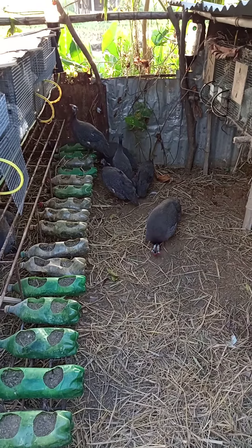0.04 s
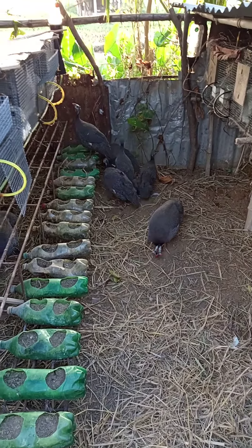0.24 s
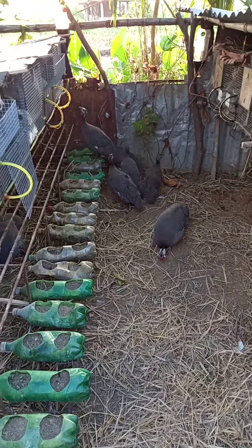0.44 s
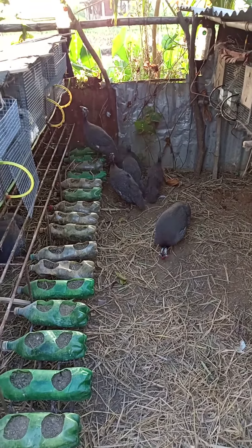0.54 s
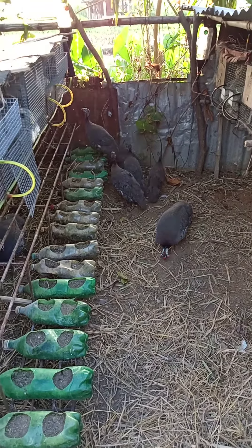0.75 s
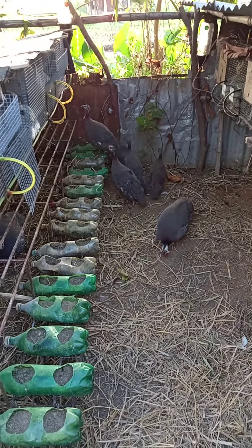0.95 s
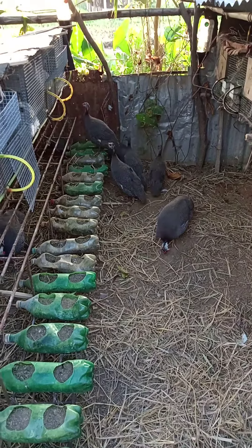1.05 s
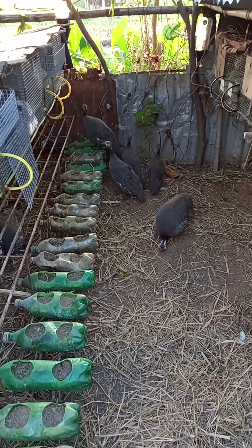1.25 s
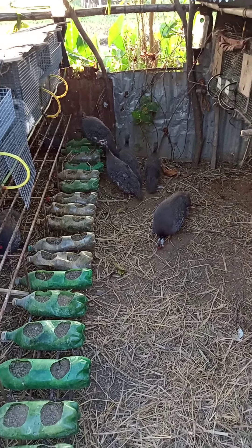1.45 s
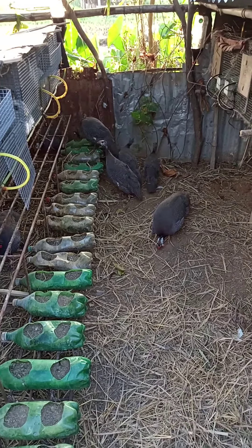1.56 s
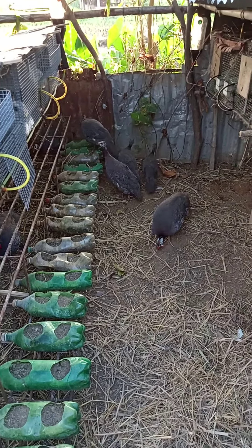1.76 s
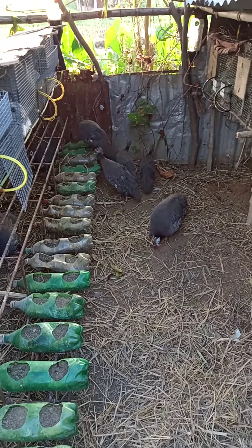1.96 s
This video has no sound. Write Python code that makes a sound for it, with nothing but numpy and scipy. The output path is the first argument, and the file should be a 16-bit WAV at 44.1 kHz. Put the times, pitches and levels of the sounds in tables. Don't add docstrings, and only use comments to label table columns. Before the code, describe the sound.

Guinea fowl nearby gives two short harsh chucks in a straw-floored pen, flock clucking softly

```python
import sys
import numpy as np
from scipy import signal
from scipy.fft import rfft, irfft
from scipy.io import wavfile
from scipy.ndimage import uniform_filter1d

SR = 44100
rng = np.random.default_rng(int(sys.argv[2]) if len(sys.argv) > 2 else 0)


def bounce(signal):
    frames = np.transpose(np.atleast_2d(signal))
    limited = np.clip(frames, -1, 1)
    pcm = np.round(limited * 32767).astype(np.int16)
    wavfile.write(sys.argv[1], SR, pcm)


def attenuation_scalar(level_db):
    decades = np.asarray(level_db, float) / 20
    return 10 ** decades


N = 88200
T = np.arange(N) / SR
HZ = np.maximum(np.arange(N // 2 + 1) * SR / N, 1)


def rms_one(x):
    return x / np.sqrt(np.mean(x ** 2) + 1e-20)


def at_hz(points):
    hz, db = np.transpose(points)
    return attenuation_scalar(np.interp(np.log(HZ), np.log(hz), db))


def drift(rate_hz):
    r = np.exp(-2 * np.pi * rate_hz / SR)
    noise = rng.standard_normal(N + SR)
    wander = signal.lfilter([1], [1, -2 * r, r * r], noise)
    return rms_one(wander[SR:])


def resonate(x, hz, width_hz):
    r = np.exp(-np.pi * width_hz / SR)
    for _ in range(2):
        x = signal.lfilter([1, 0, -1], [1, -2 * r * np.cos(2 * np.pi * hz / SR), r * r], x)
    return rms_one(x)


def swell(peak, rise, fall):
    up = np.sin(np.pi / 2 * np.clip(1 + (T - peak) / rise, 0, 1)) ** 2
    down = attenuation_scalar(-20 * np.maximum(T - peak, 0) / max(fall, .002))
    return up * down


def syrinx(rate_hz, jitter, breath):
    phase = np.cumsum(rate_hz * (1 + jitter * drift(120))) / SR
    slap_sizes = attenuation_scalar(3.4 * rng.standard_normal(N))
    slaps = np.diff(np.floor(phase), prepend=0) * slap_sizes
    puffs = rng.standard_normal(N) * np.exp(-3 * (phase % 1))
    breath = np.clip(breath, 0, 1)
    return (1 - breath) * rms_one(slaps) + breath * rms_one(puffs)


def near_chucks():
    # (start [s], pulse rate [Hz], pulse jitter [0-1], breath share [0-1], beak closes after [s])
    calls = [
        (.203, 362, .2, .55, .062),
        (1.212, 334, .15, .6, .056),
    ]
    # (pitch [Hz], width [Hz], level [dB], peak after start [s], fall per 20 dB [s])
    first_throat = [(1020, 260, -35, .022, .025), (1300, 300, -30, .026, .02), (1650, 250, -35, .011, .07),
                    (2240, 300, -30, .034, .04), (2480, 250, -28, .026, .025), (2720, 200, -29, .018, .035),
                    (3050, 300, -28, .026, .06), (3640, 260, -29, .043, .05), (3950, 400, -28, .024, .05),
                    (4600, 800, -36, .022, .07), (1900, 400, -35, .02, .05), (8200, 2000, -45, .028, .04),
                    (12500, 3500, -45, .03, .06), (3350, 250, -27, .025, .05)]
    second_throat = [(1606, 103, -34, .028, .012), (2312, 120, -31, .02, .025), (2500, 200, -30, .024, .03),
                     (2850, 170, -33, .031, .006), (3520, 300, -28, .027, .016),
                     (4050, 300, -29, .028, .008), (3700, 620, -36, .042, .015),
                     (4550, 400, -37, .022, .03), (3520, 250, -33, .053, .009),
                     (2500, 330, -41, .0057, .01), (8470, 3700, -48, .033, .03),
                     (12500, 3500, -52, .028, .04), (4950, 400, -43, .031, .012),
                     (2900, 300, -39, .051, .02)]
    # (first [s], second [s])
    longest_rise = (.02, .013)
    closing_s = .03
    out = np.zeros(N)
    for call, throat, opening in zip(calls, (first_throat, second_throat), longest_rise):
        start, rate_hz, jitter, breath, close = call
        source = syrinx(rate_hz, jitter, breath)
        shut = attenuation_scalar(-20 * np.maximum(T - start - close, 0) / closing_s)
        for k, (hz, width_hz, db, lag, fall) in enumerate(throat):
            ring = resonate(source, hz, width_hz)
            strength = np.sqrt(uniform_filter1d(ring ** 2, size=500) + 0.0086)
            shape = swell(start + lag, min(lag, opening), fall) * shut
            out += (-1) ** k * attenuation_scalar(db) * ring / strength * shape
    return out


def clear_tones():
    # (peak [s], pitch [Hz], level [dB], rise [s], fall per 20 dB [s])
    tones = [(.247, 1082, -27, .018, .013), (.228, 3540, -22, .012, .014), (.232, 377, -43, .026, .026),
             (.218, 2770, -28, .008, .008), (.238, 2440, -28, .008, .008), (.222, 2130, -33, .012, .012),
             (1.233, 2320, -27, .012, .01), (1.24, 2866, -30, .01, .007), (1.237, 1614, -33, .009, .01),
             (1.265, 3580, -33, .006, .007), (1.243, 1080, -35, .014, .015), (1.237, 3960, -25, .009, .011)]
    out = np.zeros(N)
    for peak, hz, db, rise, fall in tones:
        side = np.where(T < peak, rise, fall)
        shape = attenuation_scalar(-20 * ((T - peak) / side) ** 2)
        out += attenuation_scalar(db + 3.5) * np.sin(2 * np.pi * hz * T) * shape
    return out


def flock():
    # (peak [s], level [dB], throat pitch [Hz], fall per 20 dB [s])
    clucks = [
        (.04, -53, 1300, .06),
        (.7, -52, 2600, .04),
        (.95, -46.5, 2050, .06),
        (1.362, -50, 3000, .05),
        (1.515, -48, 2200, .05),
        (1.688, -47, 2300, .03),
        (1.842, -47, 2400, .04),
    ]
    width_hz, rise_s = 700, .02
    source = syrinx(300, 0.17, 0.52)
    out = np.zeros(N)
    for peak, db, hz, fall in clucks:
        lower = resonate(source, hz, width_hz)
        upper = attenuation_scalar(-2) * resonate(source, hz * 1.3, width_hz)
        out += attenuation_scalar(db) * swell(peak, rise_s, fall) * (lower + upper)
    return out


def whistles():
    # (start [s], length [s], from pitch [Hz], to pitch [Hz], level [dB])
    glides = [(.135, .08, 5150, 5050, -59), (.32, .1, 4050, 3880, -61), (.55, .055, 5330, 5060, -60),
              (.58, .125, 5080, 4940, -56), (.824, .052, 3280, 3290, -48), (.822, .04, 3650, 3550, -55),
              (.86, .024, 2950, 2650, -49.5), (.876, .032, 2450, 2360, -48.5), (.83, .12, 4740, 4420, -58),
              (.83, .12, 4200, 4120, -61), (.962, .028, 2660, 2670, -50), (.984, .05, 2900, 2640, -53),
              (.98, .1, 3950, 3730, -57), (1.075, .05, 5330, 5000, -59), (1.11, .075, 4950, 4680, -57),
              (1.38, .06, 5100, 4950, -59), (1.435, .07, 4800, 4300, -61), (1.575, .125, 4930, 4900, -55),
              (.93, .04, 2000, 2250, -51), (1.625, .052, 1630, 1610, -46.5), (1.695, .045, 4660, 4450, -56),
              (1.735, .06, 4450, 3900, -59), (1.8, .06, 3800, 3000, -57), (1.762, .018, 1450, 1800, -52),
              (1.773, .04, 1830, 1880, -49), (1.824, .055, 1850, 1740, -50), (1.855, .04, 1180, 1150, -54),
              (1.03, .04, 1790, 1810, -55)]
    far_hz = 4000
    waver_hz = 30 * drift(58.5)
    flutter_db = 1.3 * drift(30)
    blur = .38 * drift(130)
    out = np.zeros(N)
    for start, length, from_hz, to_hz, db in glides:
        at = slice(int(start * SR), int((start + length) * SR))
        far = min(from_hz / far_hz, 1)
        u = (T[at] - start) / length
        pitch = from_hz + (to_hz - from_hz) * u + far * waver_hz[at]
        tone = np.sin(2 * np.pi * np.cumsum(pitch) / SR)
        shape = np.abs(np.sin(np.pi * u)) ** 0.72
        out[at] += attenuation_scalar(db + far * flutter_db[at]) * (1 + far * blur[at]) * shape * tone
    return attenuation_scalar(1.8) * out


def straw():
    # (start [s], level [dB], length [s], brightness [dB per octave])
    rustles = [(.033, -50, .01, 6), (.068, -49, .01, 5), (.153, -56, .012, 4), (.188, -52, .01, 4),
               (.355, -50, .006, 3), (.379, -45, .025, 3), (.43, -54, .012, 4), (.497, -54, .02, 2),
               (.575, -55, .01, 2), (.655, -57, .085, 7), (.715, -53, .02, 2), (1.0, -55, .01, 3),
               (1.298, -53, .015, 4), (1.352, -47, .04, 1), (1.504, -48, .03, 0), (1.383, -51, .008, 4),
               (1.54, -54, .008, 5), (1.583, -54, .012, 4), (1.621, -46, .008, 3), (1.68, -55, .03, 1),
               (1.775, -53, .02, 3), (1.853, -52, .012, 3), (1.948, -41, .07, 1.5)]
    cracks_per_s, spread_db = 19000, 1
    sizes = attenuation_scalar(spread_db * np.minimum(rng.exponential(1, N), 5)) * rng.choice([-1, 1], N)
    cracks = rms_one(sizes * (rng.random(N) < cracks_per_s / SR))
    no_bass = HZ ** 2 / (HZ ** 2 + 270.0 ** 2)
    spectrum = rfft(cracks) * no_bass
    out = np.zeros(N)
    for start, db, length, tilt_db in rustles:
        burst = irfft(spectrum * attenuation_scalar(tilt_db * np.log2(HZ / 4000.)), N)
        attack = swell(start + 0.0025, 0.0023 + 0.13 * length, 8.1)
        fade = attenuation_scalar(-20 * (np.maximum(T - start, 0) / length / 1.4) ** 2)
        out += attenuation_scalar(db) * attack * fade * burst
    return out


def thuds():
    # (peak [s], pitch [Hz], level [dB], length [s])
    steps = [
        (.12, 136, -42.5, 0.02),
        (.705, 145, -43.5, 0.011),
        (1.15, 82.7, -47, 0.02),
        (1.67, 138.6, -53, 0.1),
        (1.93, 133, -46, 0.026),
        (1.99, 142, -56, 0.022),
    ]
    out = np.zeros(N)
    for peak, hz, db, length in steps:
        level_db = db - 1.5 - 20 * ((T - peak) / length) ** 2
        out += attenuation_scalar(level_db) * np.sin(2 * np.pi * hz * (T - peak))
    return out


def background():
    # (pitch [Hz], level per Hz [dB])
    colour = [(25, -43.5), (60, -6), (125, -1), (215, -8.5), (850, -11), (1600, -11), (5000, -20),
              (15000, -22)]
    # (time [s], level [dB])
    leaf_swell = [(0, -2.5), (.25, -1.5), (.45, -2.5), (.58, -1), (.75, -3), (.9, -1.5), (1.02, -1.5),
                  (1.13, -3.5), (1.25, -0.5), (1.4, -.5), (1.55, -0.5), (1.75, -0.5), (2, 1)]
    patchy_db = 1.54
    noise = rfft(rng.standard_normal(N)) * at_hz(colour)
    place = 2 * np.log2(HZ / 20)
    together = drift(5.8)
    lift_db = np.interp(T, *np.transpose(leaf_swell))
    out = np.zeros(N)
    for k in range(20):
        band = irfft(noise * np.clip(1 - abs(place - k), 0, 1), N)
        flicker_db = patchy_db * (drift(16) + 0.54 * together)
        out += band * attenuation_scalar(flicker_db + lift_db * (k > 9))
    return attenuation_scalar(-48.5) * rms_one(out)


def pen(x):
    t60_s, delay_s = .17, .008
    t = T[:SR // 4]
    tail = rng.standard_normal(len(t)) * attenuation_scalar(-60 * t / t60_s) * np.clip(t / delay_s, 0, 1) ** 2
    no_bass = signal.butter(2, 1600, "high", fs=SR, output="sos")
    tail = signal.sosfilt(no_bass, tail)
    tail = tail / np.sqrt(np.sum(tail ** 2))
    return x + attenuation_scalar(-14) * signal.fftconvolve(x, tail)[:N]


def scene():
    voices = near_chucks() + clear_tones() + flock() + whistles()
    return (pen(voices) + straw() + thuds() + background())[None]


def band_limit(x):
    return signal.sosfilt(signal.butter(12, 15500, fs=SR, output="sos"), x)


def record(dry):
    # (pitch [Hz], level [dB])
    microphone = [(4600, 2), (5300, 0), (6000, -11), (7000, -21), (10000, -29.5), (11500, -22),
                  (13000, -20), (15500, -35)]
    ceiling = .75
    rounded = ceiling * np.tanh(dry / ceiling)
    mix = irfft(rfft(rounded) * at_hz(microphone), N)
    return band_limit(mix)


dry = scene()
out = record(dry)
bounce(out)
```